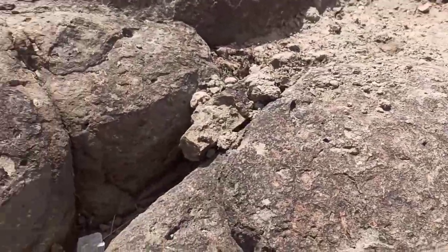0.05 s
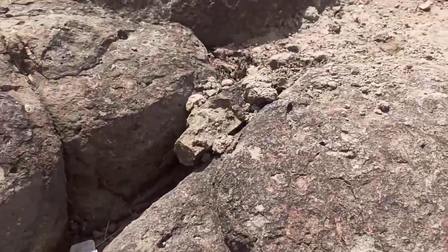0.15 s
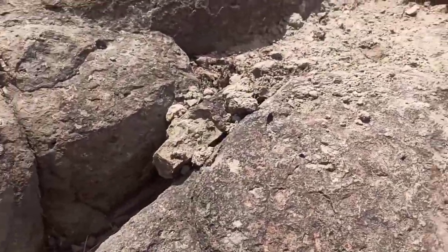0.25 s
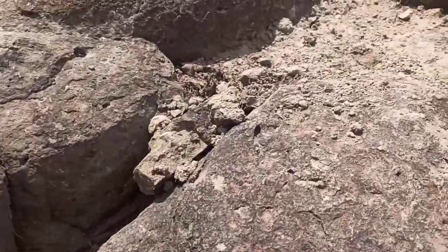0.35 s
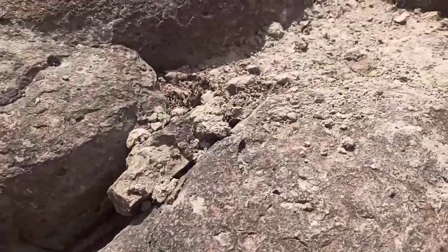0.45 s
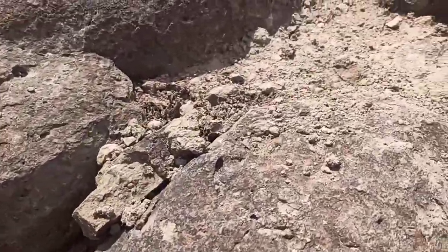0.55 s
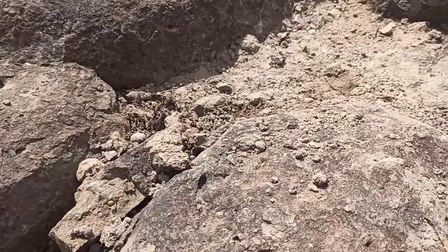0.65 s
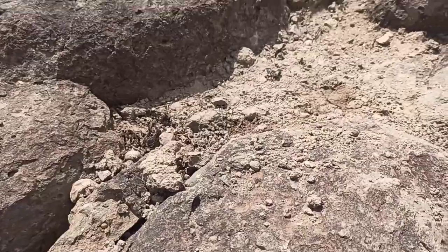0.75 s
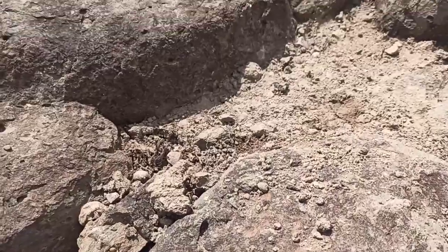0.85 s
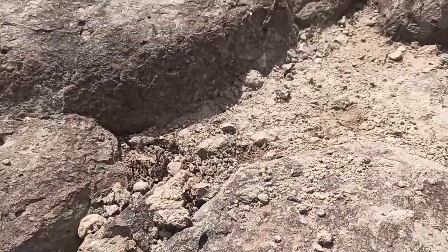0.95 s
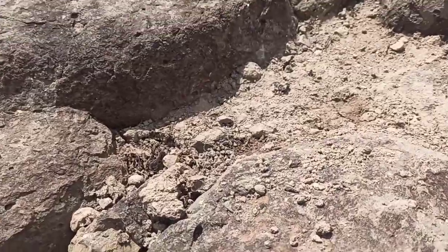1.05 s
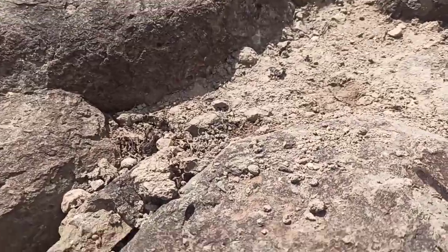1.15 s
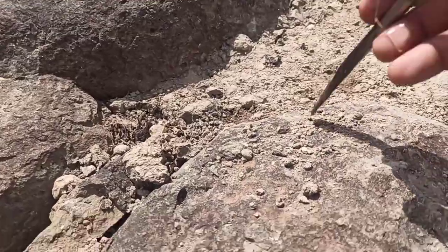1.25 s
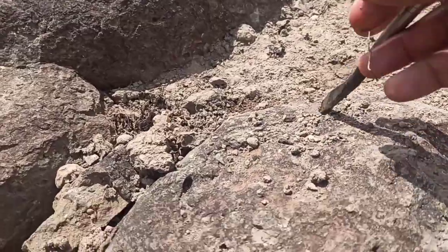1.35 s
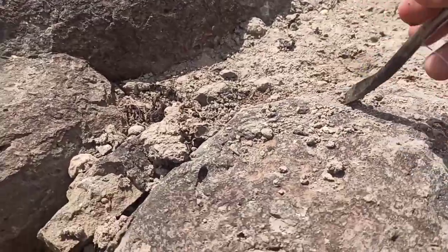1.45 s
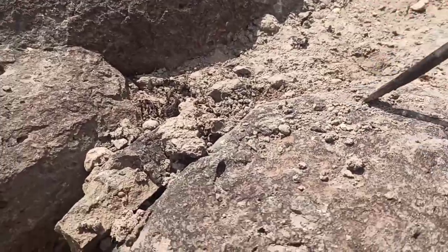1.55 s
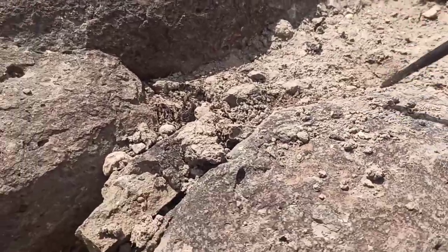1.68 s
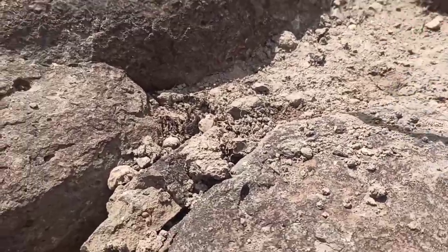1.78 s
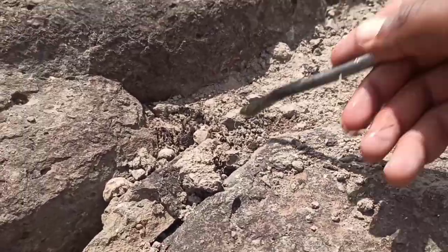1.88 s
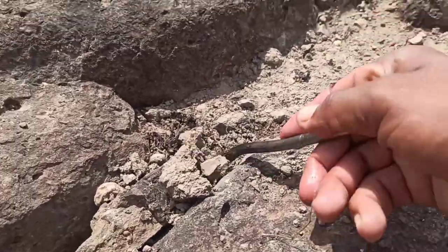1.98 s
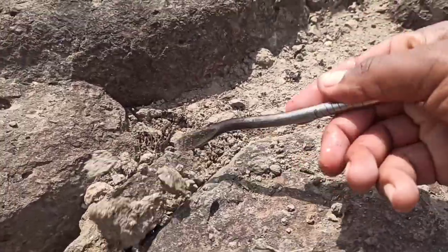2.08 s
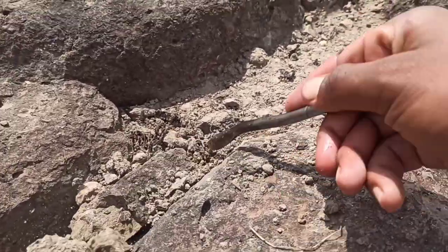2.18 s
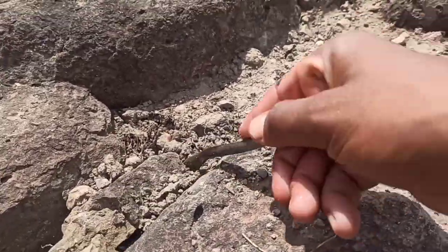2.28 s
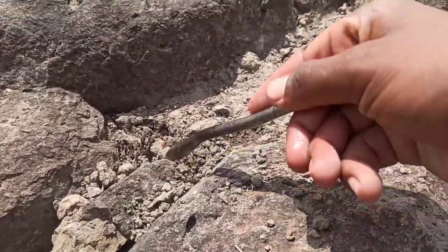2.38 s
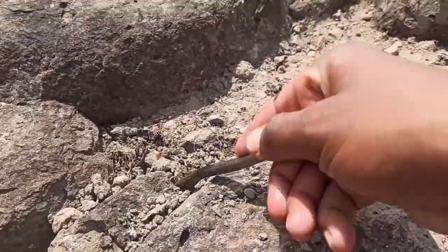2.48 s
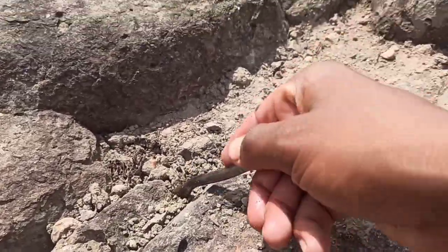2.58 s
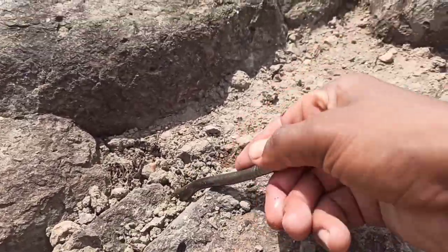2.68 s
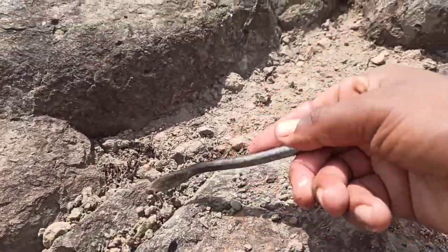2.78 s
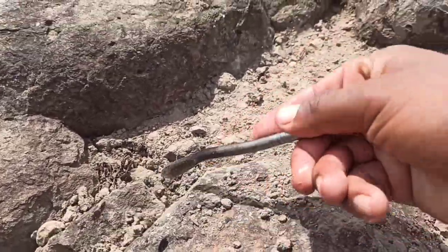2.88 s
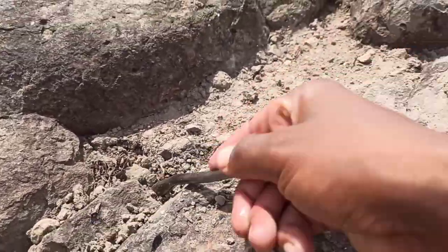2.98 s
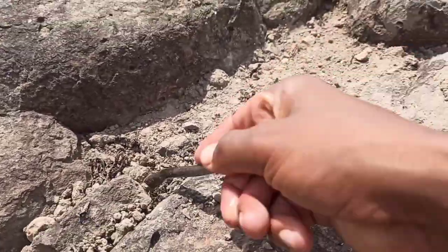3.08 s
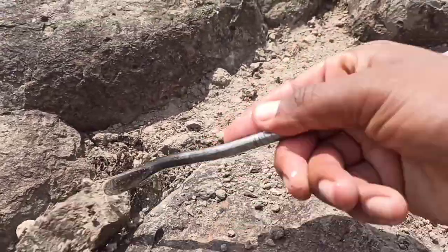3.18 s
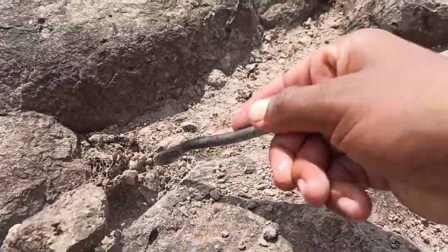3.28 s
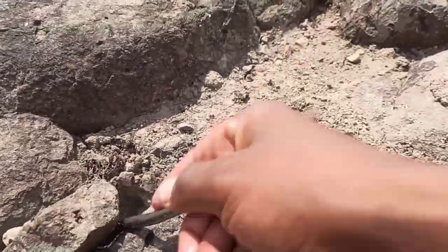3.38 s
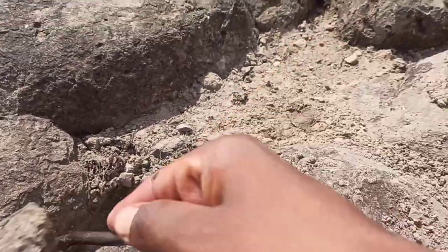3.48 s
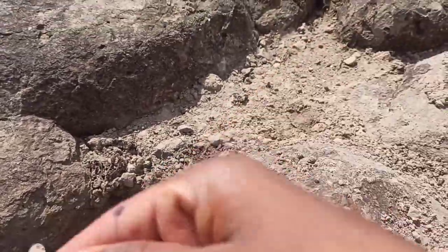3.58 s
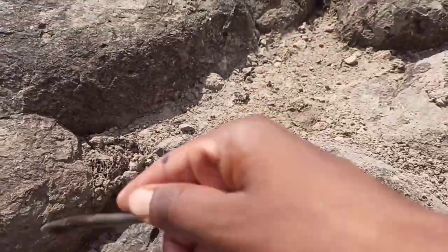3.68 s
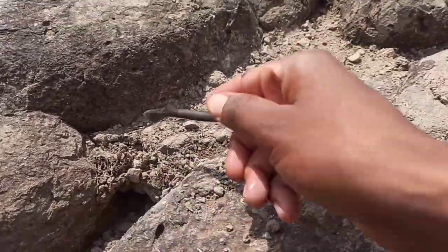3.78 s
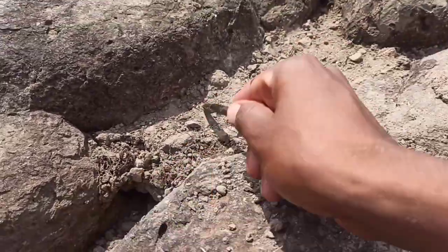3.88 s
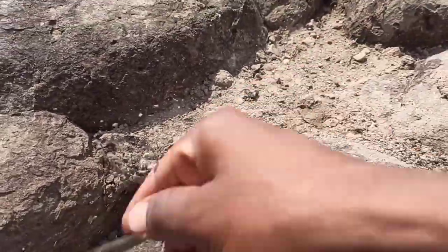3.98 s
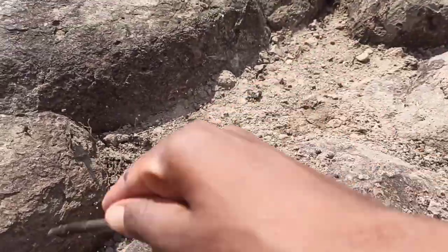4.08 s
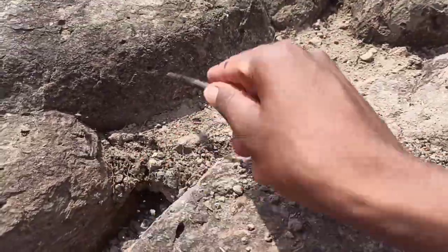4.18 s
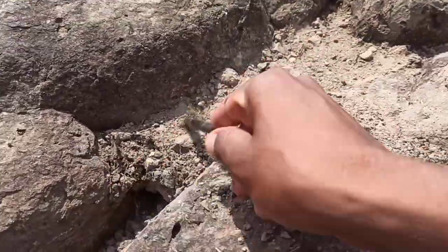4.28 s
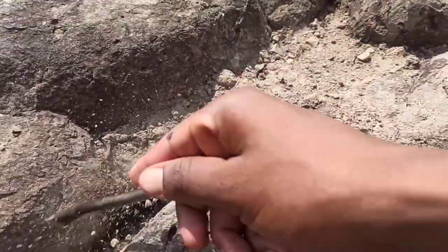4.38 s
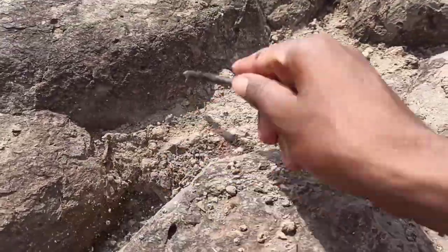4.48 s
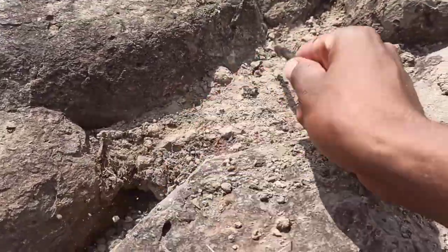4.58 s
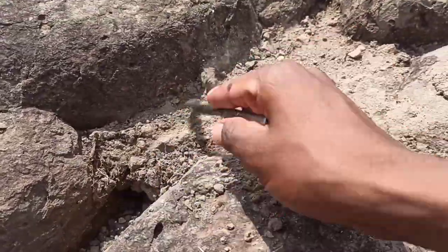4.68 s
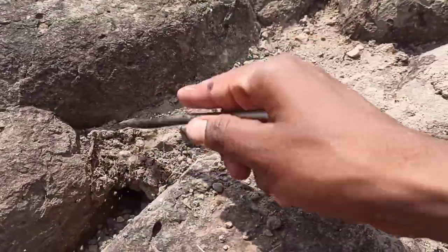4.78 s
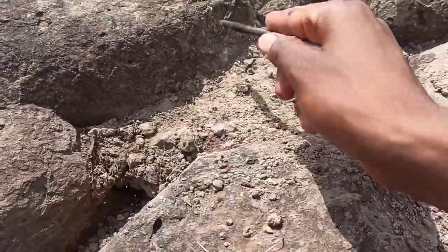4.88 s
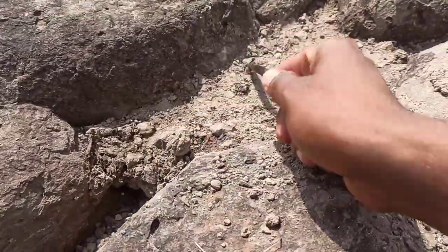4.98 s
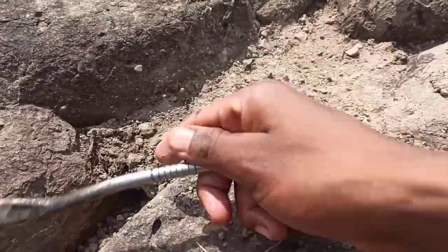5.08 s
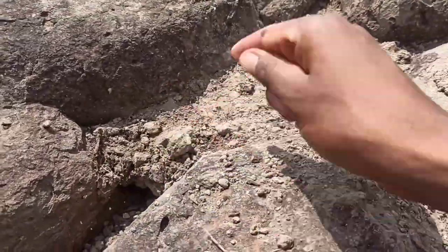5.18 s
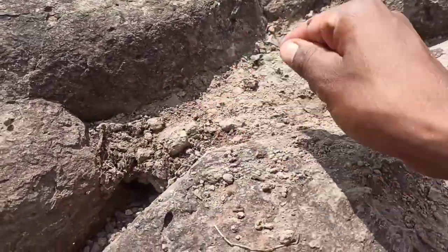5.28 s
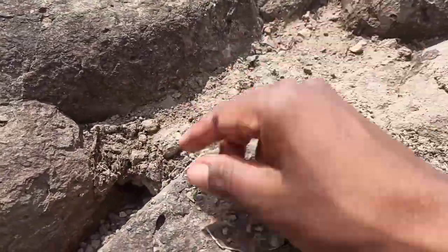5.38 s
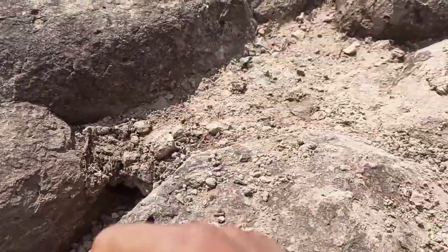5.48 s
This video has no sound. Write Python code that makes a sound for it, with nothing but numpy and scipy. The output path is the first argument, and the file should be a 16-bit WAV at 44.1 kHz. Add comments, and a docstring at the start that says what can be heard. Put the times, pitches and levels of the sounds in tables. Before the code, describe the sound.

A hand digs with a small metal pick between rocks in the open. After a sparse first two seconds, bright clicks, crunchy scrapes and small stone knocks come in irregular bursts, with loose soil trickling. Low soft thuds and air buffeting surround the close microphone. Final clinks ring longer, with a short thin echo off the rock.

```python
"""Outdoors, at a crack between rocks, a small steel pick pries and scrapes out loose stones close by.
Steel ticks, stone knocks and scrapes are shaped noise and grains through the colours of stone, steel and grit.
The pick is a set of beating bending modes: choked in the fingers, freer at the end when it is let go and
bounces on the rock. Stirred grit follows the work; a short echo, a sleeve, low bumps and air surround it."""
import sys
import numpy as np
from scipy import signal
from scipy.fft import rfft, irfft
from scipy.io import wavfile

SR = 44100
rng = np.random.default_rng(int(sys.argv[2]) if len(sys.argv) > 2 else 0)


def master(y):
    """Save y as 16-bit WAV."""
    cut = np.clip(np.atleast_2d(y).T, -1, 1)
    pcm = np.round(cut * 32767)  # scale
    wavfile.write(sys.argv[1], SR, pcm.astype(np.int16))


N = 244531
TIME = np.arange(N) / SR

# steel ticks on bare rock: (t/s, relative level/dB, decay/s, grit crushed 0-1, left minus right/dB)
TICKS = [(0.543, -33, 0.00077, 0.17, -5.5), (0.562, -42.5, .0007, 0, -4), (1.335, -35.5, 0.00081, 0.87, -7),
         (1.541, -58, 0.0052, 0.84, 1), (1.98, -40.5, 0.0073, 0.88, -2), (2.098, -32, 0.00059, 0.01, 7),
         (2.197, -54, 0.00088, 0.93, 0), (2.237, -53, 0.0014, 1, 3), (2.2844, -21, 0.00095, 0.27, 5.5),
         (2.288, -20, .0003, 0.2, 3.5), (2.364, -46.5, 0.0046, .9, 3), (2.418, -46, .002, .1, 4),
         (2.526, -43, 0.0029, 0.75, 4), (2.548, -39, 0.0055, 0.62, 3.5), (2.798, -33.5, 0.0071, 0.2, 5),
         (2.809, -16.5, 0.00083, 0.19, -1), (2.859, -36, 0.003, 0.37, 0), (3.225, -21, 0.0017, 0.03, 4),
         (3.243, -30, 0.00095, 0, 4), (3.458, -33, .0009, 0.96, 0.5), (3.466, -36, 0.0022, 0.82, 5),
         (3.588, -35.5, 0.0056, 0.5, 8.5), (4.0651, -31.5, 0.001, 0.68, -5.5), (4.088, -42.5, .003, 0.7, 1),
         (4.173, -57, 0.0017, 0.5, -2.5), (4.381, -45, 0.002, .8, 2), (4.431, -47.5, .002, 0.48, -6),
         (4.611, -44, .0006, 0, 0.5), (5.057, -38, 0.0013, 0.79, -16), (5.275, -40.5, 0.0015, 0.9, -6.5),
         (5.3407, -40, 0.00065, 1, -2.5), (5.464, -42, .0066, 0.95, -10), (5.475, -33, 0.00078, 1, 0.5)]
# stones knocked into soil: (t/s, relative level/dB, f/Hz, decay/s, bite of the steel 0-1, left minus right/dB)
KNOCKS = [(1.991, -30, 820, .0008, 0.7, 4.5), (2.009, -42.5, 810, 0.0017, 0.5, 5),
          (2.256, -52.5, 730, .0004, 0.9, 4), (2.296, -37.5, 770, 0.00081, .4, 1),
          (2.567, -47.5, 764, 0.0078, 0.83, -2), (2.948, -47, 814, 0.0004, 0.8, 2),
          (2.972, -46.5, 950, 0.0004, 0.91, 1), (3.074, -46.5, 700, 0.0059, 0.89, 1.5),
          (3.145, -42.5, 690, 0.0021, 0.34, 2), (3.258, -35.5, 565, 0.003, .1, 0),
          (3.448, -47.5, 1330, 0.0058, 0.9, 3), (3.505, -39.5, 234, 0.0024, 0, -19),
          (3.543, -33.5, 265, 0.0036, 0.35, -17), (3.673, -51, 980, 0.0047, 1, 15),
          (3.685, -39.5, 610, 0.0013, 1, -1), (3.695, -27.5, 990, 0.0025, 0.76, 8.5),
          (3.707, -46, 670, 0.005, 1, -2), (3.771, -39, 870, 0.00035, 0.61, 6.5),
          (3.96, -30, 464, 0.0023, 0.43, -1), (3.987, -37.5, 614, .003, 0.7, 4),
          (3.995, -35, 467, 0.0077, 1, -4), (4.007, -34, 640, 0.002, .25, 5.5),
          (4.332, -28, 520, .0033, .85, 1.5), (4.362, -36, 673, 0.0016, 0.1, 3),
          (4.682, -26, 634, 0.001, 0.8, 0.5), (4.707, -26.5, 610, 0.0013, 0.1, 2),
          (4.732, -42.5, 510, 0.0099, 0.57, 1), (4.772, -42.5, 590, 0.0029, 0.91, 0.5),
          (4.806, -45.5, 460, 0.0026, .2, -1), (4.838, -37, 710, 0.00099, 0.23, 2),
          (5.042, -26, 457, 0.0016, 0.53, 1), (5.05, -29.5, 456, 0.0023, 0.6, -2),
          (5.084, -30.5, 543, 0.0019, 0.94, 2.5), (5.195, -52.5, 1016, 0.0033, 0.74, 4),
          (5.224, -55, 1050, 0.0016, .3, 3), (5.459, -37.5, 800, 0.0019, 0.54, 0)]
# end points of the contact mixes: (knock level/dB, crack level/dB, ting level/dB, fizz level/dB)
CLEAN_TICK = (-25.5, -10.5, -1.5, -26)
CRUSHING_TICK = (-2.5, 5.5, -0.5, -3)
DULL_KNOCK = (0.5, -26, -32, -39)
BITING_KNOCK = (0, 1.5, -1.5, -7.5)


def blows(tick_hz=850):
    """Ticks and knocks alike as (s, levels of the four parts, knock Hz, decay s, left minus right dB)."""
    hits = []
    for s, db, decay, crush, pan in TICKS:
        hits.append((s, db + between(CLEAN_TICK, CRUSHING_TICK, crush), tick_hz, decay, pan))
    for s, db, hz, decay, bite, pan in KNOCKS:
        hits.append((s, db + between(DULL_KNOCK, BITING_KNOCK, bite), hz, decay, pan))
    return hits


# ting of the steel tip: (f/Hz, level/dB)
TING_COLOUR = [(4000, -16.5), (5100, -12.5), (5700, 0.5), (6200, 0.5), (6500, 6), (6800, -4), (7500, -8),
               (8400, -13), (9400, -28), (11000, -60)]
# fizz of crushed grit: (f/Hz, level/dB)
FIZZ_COLOUR = [(9500, -14.5), (11200, -28), (11900, -12), (13400, -5.5), (14700, -2), (15500, -21),
               (16300, -16.5)]


def contacts(rise_s=0.00049, tail_db=-21, tail_s=0.0068, lead_in_db=-19, lead_in_fade_s=.003, early_s=.0007,
             tip_share=0.48):
    """A faint noise swells before each contact and fades after it; a dense chatter of micro-impacts
    makes the blow and leaves a faint spray of crumbs."""
    out, t = np.zeros((2, N)), np.arange(-500, 3000) / SR
    after = np.maximum(t, 0)
    for s, levels, hz, decay, pan in blows():
        rise = 1 - np.exp(-after / rise_s)
        blow = rise ** 2 * np.exp(-after / max(decay, .0003))
        envelope = blow / blow.max() + amp(tail_db) * rise * np.exp(-after / tail_s)
        lead_in = amp(lead_in_db) * np.exp(-abs(t) / lead_in_fade_s)
        chatter = ports(rng.standard_normal((3, len(t))), apart=0.94) * (envelope + lead_in)
        push = ports(rng.standard_normal((3, len(t))), apart=0.24) * envelope
        knock = unit(colour(push, knock_colour(hz))) + amp(HOLLOW[2]) * hollow_boom(push)
        ting = unit(colour(chatter, TING_COLOUR)) + tip_share * tip(after)
        hardness = np.tanh((levels[2] - levels[0]) / 20)  # towards +1 steel on rock, -1 stone in soil
        parts = (knock, pebble(chatter, hardness), ting, colour(chatter, FIZZ_COLOUR))
        hit = sum(amp(db) * unit(part) for db, part in zip(levels, parts))
        hit *= np.sqrt(SR / 100 / len(t))  # the energy of each part's rms level held for 10 ms
        add(out, s + t[0] - early_s, hit * balance(pan))
    return out


def knock_colour(hz):
    """A stone bedded in soil: a spectrum with one broad, well-damped peak."""
    return [(hz * 0.17, -22), (hz * 0.58, -4), (hz, 0), (hz * 1.44, -7), (hz * 3, -24), (hz * 6, -44)]


# hollow under the stones: (f/Hz, t60/s, level in a knock/dB)
HOLLOW = (373.4, 0.041, -8)


def hollow_boom(x):
    """A hollow under the stones booms as one damped mode, driven by the contact."""
    hz, t60, _ = HOLLOW
    return unit(ringing(x, hz, t60))


# crack of stone: (f/Hz, level/dB)
CRACK_COLOUR = [(700, -27.5), (1400, -5.5), (1800, -2), (2600, -1), (3400, 1.5), (4400, 0), (5000, -15),
                (6000, -38.5)]
# modes of the stones under the tip: (nominal f/Hz, relative level/dB, nominal t60/s)
STONE_MODES = [(1230, -2, 0.014), (1753, -2, 0.017), (2340, -1.5, 0.0057), (3570, -11.5, 0.009),
               (3890, -0.5, 0.013), (4377, 3, 0.022)]


def pebble(x, hardness, share=0.87, tilt_db=7, scatter_db=3, detune=0.051):
    """Stones differ a little in their modes; a hard, short contact favours the high ones."""
    chance = rng.standard_normal((len(STONE_MODES), 2))
    modes = 0
    for (hz, db, t60), (louder, sharper) in zip(STONE_MODES, chance):
        octaves = np.log2(hz / STONE_MODES[0][0])
        level = amp(db + scatter_db * louder + tilt_db * hardness * octaves)
        modes = modes + level * unit(ringing(x, hz * (1 + detune * sharper), t60))
    return unit(colour(x, CRACK_COLOUR)) + share * unit(modes)


def tip(t, hz=6150, t60=0.016, rise_s=0.00081, detune=0.028):
    """The steel tip sings for a moment as a damped sine, at a slightly different pitch each time."""
    pitch = hz * (1 + detune * (2 * rng.random() - 1))
    tone = np.sin(2 * np.pi * (pitch * t + rng.random((2, 1)) / 4))
    return unit((1 - np.exp(-t / rise_s)) * amp(-60 * t / t60) * tone)


# scrapes through grit: (start t/s, end t/s, relative level/dB, from soil 0 to bare rock 1)
SCRAPES = [(.365, 0.402, -56.5, 0.89), (0.491, 0.534, -55.5, 0.93), (1.465, 1.552, -65, 0.99),
           (1.981, 2.019, -38, 0.38), (2.06, 2.125, -45.5, 0.47), (2.287, 2.326, -47.5, 0.34),
           (2.374, 2.444, -43.5, 0.56), (2.536, 2.608, -46, 0.22), (2.753, 2.825, -47.5, 0.24),
           (2.844, 2.871, -38.5, 0.87), (3.033, 3.088, -49.5, .6), (3.133, 3.182, -49.5, 0.47),
           (3.222, 3.265, -44, 0.92), (3.47, 3.577, -46, 0.37), (3.56, 3.606, -42, 0.96),
           (3.673, 3.761, -44.5, 0.58), (3.764, 3.85, -59, 0.16), (3.983, 4.043, -49, 1),
           (4.335, 4.389, -45, 0), (4.681, 4.717, -35.5, 0.17), (5.041, 5.072, -40, 0),
           (5.478, 5.521, -42, 0.74)]
# end points of the scrape mix: (knock level/dB, crack level/dB, ting level/dB, fizz level/dB)
SOIL_SCRAPE = (2, -5, -15, -16)
ROCK_SCRAPE = (-13.5, 2, 1, -8.5)


def scrapes(level_db=2.0, soil_hz=660, hollow_db=-7):
    """Dragging crushes many grains, which excite steel and hollow and crack against several small stones."""
    out = np.zeros((2, N))
    for start, end, stroke_db, rock in SCRAPES:
        levels = level_db + stroke_db + between(SOIL_SCRAPE, ROCK_SCRAPE, rock)
        count = max(round((end - start) * SR), 200)
        pressure = np.pad(signal.windows.tukey(count, .7), (0, 1500))  # room for the ringing to die away
        crunch = grains(len(pressure), per_s=2800, spread_db=4) * pressure
        strength = np.std(crunch)
        boom = amp(hollow_db) * strength * hollow_boom(crunch)
        chips = 0
        for hz, db, t60 in STONE_MODES:
            hits = grains(len(pressure), per_s=300, spread_db=2.5) * pressure
            chips = chips + amp(db) * ringing(hits, hz * rng.uniform(0.886, 1.186), t60 / 2)
        crack = (colour(crunch, CRACK_COLOUR) + strength * unit(chips)) / np.sqrt(2)
        knock = colour(crunch, knock_colour(soil_hz)) + boom
        parts = (knock, crack, colour(crunch, TING_COLOUR), colour(crunch, FIZZ_COLOUR))
        add(out, start, sum(amp(db) * part for db, part in zip(levels, parts)))
    return out


# the pick is set ringing: (t/s, time until stopped/s, relative level/dB, struck from shaft 0 to tip 1,
# share of the second bending plane 0-1, left minus right/dB)
RINGS = [(1.336, 0.035, -26, 0.044, 0.97, -3), (1.478, 0.037, -40, 0.82, 0.63, 4),
         (1.578, 0.059, -48, 1, 0.66, -7), (1.686, 0.018, -37.5, 0.59, 0.28, -5.5),
         (2.095, 0.016, -20.5, 1, 0.1, 5), (2.412, 0.024, -24.5, 0.94, 0.3, 1),
         (2.528, 0.015, -27, .95, 0.25, -1), (2.854, .014, -27, .95, 0.4, 6),
         (3.226, 0.03, -28, 1, .25, -4), (3.585, 0.021, -29, 0.56, 0.6, 1), (3.96, 0.013, -33, 0.98, .5, 5),
         (4.088, 0.0094, -33, 0.0087, 0.55, 6.5), (4.36, 0.056, -40.5, 0.57, 0.2, -2),
         (4.746, 0.04, -49.5, 0.067, 0.66, 0), (5.046, 0.065, -32.5, 0.44, 0.3, 1),
         (5.276, 0.11, -30.5, 0.1, .2, -5), (5.3427, 0.15, -21, 0.59, 0.35, -0.5),
         (5.473, 0.19, -23, 0.38, 0.75, 1)]
# bending modes of the pick: (f/Hz in one bending plane, f/Hz in the other, relative level/dB, t60/s)
STEEL_MODES = [(1176, 1218, -4.5, 0.96), (3230, 3288, 1, 0.74), (5866, 6600, -11, 0.25),
               (6223, 6237, -8, 0.7), (9230, 9205, -1, 0.3), (10400, 10410, -13, 0.98),
               (13349, 13375, 6, 0.11), (14350, 14400, 1, .25)]
# which column of the blow tables below drives each bending mode: (index)
BEND_OF_MODE = [0, 1, 2, 2, 3, 3, 3, 3]
# bends excited by a blow: (first level/dB, second level/dB, third level/dB, overtones level/dB)
SHAFT_BLOW = (1, -0.5, -8, -12)
TIP_BLOW = (-25, -20, 0.5, -25.5)


def pick_ring(level_db=-1.5, stop_s=0.0034, port_turns=0.34, tumble_db=4.5, tumble_hz=24,
              waver_turns=0.077, waver_hz=70, grip_s=0.032, sway_turns=0.045):
    """The rod bends in two planes at close pitches, so each mode beats until fingers or rock stop it."""
    out, t = np.zeros((2, N)), np.arange(SR // 6) / SR
    for s, free_s, blow_db, place, second, pan in RINGS:
        bends_db = blow_db + between(SHAFT_BLOW, TIP_BLOW, place)
        second = np.clip(second, 0, 1)
        shares = np.array([1 - second, second]) / np.hypot(1 - second, second)
        grip = np.exp(-(free_s / grip_s) ** 2)  # a ring that is choked early also rattles
        ring = np.zeros((2, len(t)))
        for (one_hz, other_hz, db, t60), bend in zip(STEEL_MODES, BEND_OF_MODE):
            # as the rod turns and trembles, the lobes of each mode sweep past the ports
            swell_db = tumble_db * (1 - grip) * wander(len(t), tumble_hz)
            tremble = 2 * grip * waver_turns * wander(len(t), waver_hz)[0]
            sway = sway_turns * wander(len(t), tumble_hz)[0]
            level = amp(db + bends_db[bend] + swell_db - 60 * t / t60)
            for hz, share in zip((one_hz, other_hz), shares):
                phase = rng.random() + port_turns * (2 * rng.random((2, 1)) - 1) + tremble + sway
                ring += share * level * np.sin(2 * np.pi * (hz * t + phase))
        stopped = (1 - np.tanh((t - free_s + stop_s) / (2 * stop_s))) / 2
        onset = 1 - np.exp(-t / 0.00086)
        add(out, s, ring * stopped * onset * balance(pan))
    return amp(level_db) * out


# loose grit under the tip, most of it deep in the crack: (t/s, relative level/dB)
LOOSE_GRIT = [(0, -12), (1.4, -19), (2.05, -3), (2.9, -2.5), (3.85, 0), (4.2, -11.5), (4.55, 0.5),
              (4.9, -10.5), (5.54, -8)]
# fine trickling soil: (f/Hz, level/dB)
GRIT_COLOUR = [(200, -10.5), (500, 9), (1000, 7), (2200, -4.5), (4200, 3), (5200, -8), (6800, 2),
               (8300, -6), (9300, -13.5), (11000, -28), (12000, -5), (15000, -10.5), (16500, -20)]


def grit(digging, level_db=-37.0, hiss=0.77, crumbs=0.66, crumb_fizz=0.35, clump_db=3.0, clump_hz=9,
         settle_s=0.089, follow=0.53):
    """Stirred soil trickles as dense grains over a hiss; clusters of crumbs tick on the rock."""
    keep = np.exp(-1 / (settle_s * SR))
    work_power = signal.lfilter([1 - keep], [1, -keep], (digging ** 2).mean(0))
    stirred_db = 10 * np.log10(work_power + 1e-12)
    trickle = unit(grains(N, per_s=980, spread_db=2.5) + hiss * rng.standard_normal((2, N)))
    clumps = amp(clump_db * wander(N, clump_hz)[0])
    falls = unit(grains(N, per_s=70, spread_db=3.5) * clumps)
    ticks = unit(pebble(falls, hardness=0)) + crumb_fizz * colour(falls, FIZZ_COLOUR)
    # follow: dB of grit gained for each dB of the work
    flow_db = level_db + follow * stirred_db + np.interp(TIME, *np.transpose(LOOSE_GRIT))
    return (colour(trickle, GRIT_COLOUR) + crumbs * ticks) * amp(flow_db)


def rock_echo(x, level_db=-19, t60=0.12):
    """Nearby rock faces scatter a short, thin echo: sparse random reflections that die away."""
    t = np.arange(SR // 6) / SR
    sparse = rng.random((2, len(t))) < .08
    taps = rng.standard_normal((2, len(t))) * sparse * (t > .002) * amp(-60 * t / t60)
    return amp(level_db) * signal.fftconvolve(x, taps / np.linalg.norm(taps[0]), axes=1)[:, :N]


# clothing rustles faintly, fading once the arm has come forward: (t/s, level/dB)
RUSTLE = [(0, -57), (.42, -55.5), (.7, -58), (1.1, -66.5), (1.95, -69.5)]
# cloth fibres: (f/Hz, level/dB)
RUSTLE_COLOUR = [(70, -7.5), (160, 6), (400, 1), (900, 0), (2000, -3), (3300, 0.5), (5200, -4.5),
                 (6600, 0.5), (8200, -7), (9300, -19), (11000, -27.5), (12000, -7), (15000, -14.5),
                 (16300, -25.5)]
# swishes of the sleeve: (t/s at the peak, level/dB, time from peak to 1/e/s)
SWISHES = [(0.811, -48.5, 0.015), (0.87, -36.5, 0.032), (0.986, -46.5, 0.053)]


def rustle(flutter_db=1.0, flutter_hz=35, pan_db=-.5, folds_db=-58, folds_hz=520, lumps_db=3, lumps_hz=18):
    """Cloth fibres slip in great numbers, unlike at each port; folds of the sleeve rub dully underneath."""
    swishes = sum(amp(db) * np.exp(-((TIME - s) / fall_s) ** 2) for s, db, fall_s in SWISHES)
    steady = amp(np.interp(TIME, *np.transpose(RUSTLE)))
    motion_db = 20 * np.log10(np.hypot(steady, swishes))
    fibres = colour(rng.standard_normal((2, N)), RUSTLE_COLOUR)
    fibres *= amp(motion_db + flutter_db * wander(N, flutter_hz)[0])
    folds = colour(grains(N, per_s=460, spread_db=-1.5), knock_colour(folds_hz))
    folds *= amp(np.minimum(motion_db, folds_db) + lumps_db * wander(N, lumps_hz)[0]) / 2
    return fibres * balance(2 * pan_db) + folds


# low bumps: air and handling, and a rock rolling near 3.5 s: (t/s, relative level/dB, nominal f/Hz)
BUMPS = [(0.858, -46, 151), (0.993, -44, 162), (2.285, -31, 150), (2.306, -31, 116), (2.359, -33.5, 126),
         (2.42, -32, 129), (2.452, -29, 88), (2.736, -33, 96), (2.789, -30, 99), (2.94, -37, 108),
         (3.274, -28.5, 110), (3.385, -33.5, 140), (3.481, -28.5, 107), (3.505, -23.5, 109),
         (3.535, -25, 172), (3.555, -26, 210), (4.651, -39, 117), (5.075, -36.5, 109.4), (5.26, -32, 144),
         (5.339, -34.5, 101)]


def bumps(half_cycles=1.24, level_db=3.5):
    """Each bump is a few slow swings of pressure, unlike at the two ports."""
    out, t = np.zeros((2, N)), np.arange(-2000, 2000) / SR
    for s, db, hz in BUMPS:
        port_hz = hz * rng.uniform(0.79, 1.36, (2, 1))
        swing = np.sin(2 * np.pi * (port_hz * t + rng.random((2, 1))))
        add(out, s + t[0], amp(db + level_db) * swing * np.exp(-(t * hz / half_cycles) ** 2))
    return out


# air buffeting the microphone while the hand works near it: (t/s, relative level/dB)
BUFFET = [(0, -76.5), (1.93, -72), (2.35, -47), (2.6, -49), (3.1, -47), (3.52, -41.5), (3.85, -52.5),
          (4.5, -47.5), (4.85, -59), (5.05, -48.5), (5.54, -65.5)]
# low eddies of the buffeting: (f/Hz, level/dB)
BUFFET_COLOUR = [(20, -22), (40, -47), (60, -8.5), (85, 3.5), (130, -3), (200, -10.5), (300, -22.5),
                 (600, -40.5), (1500, -60.5)]
# still outdoor air: (f/Hz, level/dB)
AIR_COLOUR = [(30, -38), (100, 4), (350, 3), (600, -8), (1500, -11), (4000, -15.5), (8000, -37),
              (10000, -41), (12000, -30), (15000, -11), (16500, -59)]


def air(buffet_db=5.0, lumps_db=4.5, lumps_hz=14, wash_db=-60.5):
    """A steady outdoor wash of noise, and lumpy low eddies that differ at each port."""
    buffet = np.interp(TIME, *np.transpose(BUFFET))
    strength = amp(buffet_db + buffet + lumps_db * wander(N, lumps_hz)[0])
    eddies = colour(rng.standard_normal((2, N)), BUFFET_COLOUR) * strength
    wash = colour(unit(ports(rng.standard_normal((3, N)), apart=1.08)), AIR_COLOUR)
    return eddies + amp(wash_db) * wash


def grains(count, per_s, spread_db):
    """Random clicks of varied size, each heard a little differently at the two ports."""
    size = amp(spread_db * np.minimum(rng.exponential(1, count), 4)) * (rng.random(count) < per_s / SR)
    return unit(ports(rng.standard_normal((3, count)) * size, apart=1.0))


def ringing(x, hz, t60):
    """One damped mode, driven by x."""
    pole = np.exp((2j * np.pi * hz - np.log(1000) / t60) / SR)
    return signal.lfilter([1], [1, -pole], x).imag


def wander(count, hz):
    """Smooth random drift of rms about 1 at each port: twelve sines at 0.3 to 1.3 times hz."""
    t = np.arange(count) / SR
    coarse = np.append(t[::32], t[-1])
    speed, phase = rng.random((2, 12, 2, 1))
    drift = np.sin(2 * np.pi * (hz * (.3 + speed) * coarse + phase)).sum(0) / np.sqrt(6)
    return np.array([np.interp(t, coarse, port) for port in drift])


def ports(three, apart):
    """One shared signal, reaching the left port 7 samples early, plus a part of its own at each port."""
    late = np.pad(three[0], (7, 0))[:three.shape[1]]
    return np.array([three[0], late]) + apart * three[1:]


def balance(pan_db):
    """Left and right gains that differ by pan_db."""
    return amp([[pan_db / 2], [-pan_db / 2]])


def between(low, high, share):
    """Slides from one set of levels to another."""
    return np.add(low, np.clip(share, 0, 1) * np.subtract(high, low))


def amp(db):
    """Decibels to gain."""
    return 10 ** (np.asarray(db) / 20)


def unit(x):
    """Scales to rms 1."""
    return x / np.sqrt(np.mean(x ** 2) + 1e-20)


def colour(x, points):
    """Causal filter that follows a spectrum of (Hz, dB) points and keeps the power of white noise."""
    size = 4096
    hz, db = np.transpose(points)
    log_f = np.log(np.abs(np.fft.fftfreq(size, 1 / SR)) + 1)
    below = np.maximum(np.log(hz[0]) - log_f, 0)
    above = np.maximum(log_f - np.log(hz[-1]), 0)
    log_gain = np.log(amp(np.interp(log_f, np.log(hz), db)))
    log_gain -= 2 * np.minimum(below + above, 2)  # falls 12 dB per octave beyond the end points, then levels off
    minimum_phase = np.exp(np.conj(signal.hilbert(log_gain)))
    taps = np.fft.ifft(minimum_phase).real[:size // 2]
    return signal.fftconvolve(x, taps[None] / np.linalg.norm(taps), axes=1)[:, :x.shape[1]]


def add(mix, s, sound):
    """Mixes a stereo sound in at time s."""
    part = mix[:, max(round(s * SR), 0):][:, :sound.shape[1]]
    part += sound[:, :part.shape[1]]


def scene():
    """The work in the crack, its echo, the trickling grit, the sleeve, the open air and the bumps."""
    digging = contacts() + scrapes()
    work = digging + pick_ring()
    return work + rock_echo(work) + grit(digging) + rustle() + air() + bumps()


def record(dry, edge_hz=16300):
    """The two ports differ, mostly in the treble; then a low-pass sets the band limit."""
    hz, left_db = np.transpose([(500, 0.5), (4500, 2.5), (6500, -0.9), (8000, -8.5), (10000, -9.5),
                                (13000, -1.0), (16000, -4.0)])
    tilt_db = np.interp(np.fft.rfftfreq(N, 1 / SR), hz, left_db)
    heard = irfft(rfft(dry) * amp([tilt_db, -tilt_db / 2]), N)
    low_pass = signal.firwin(255, edge_hz, window=("kaiser", 9), fs=SR)
    return signal.oaconvolve(heard, low_pass[None], "same")


dry = scene()
out = record(dry)
master(out)
```